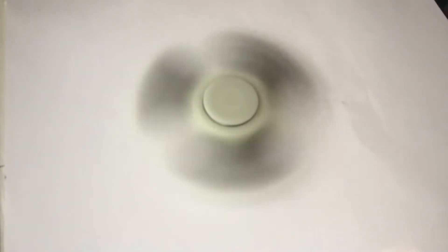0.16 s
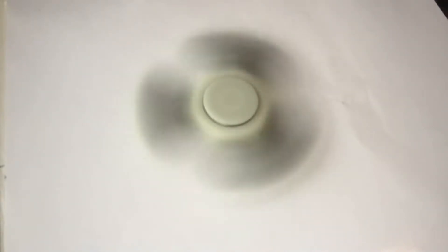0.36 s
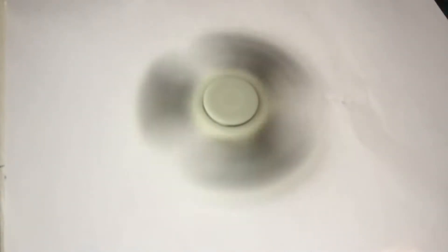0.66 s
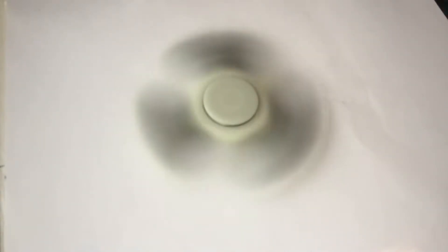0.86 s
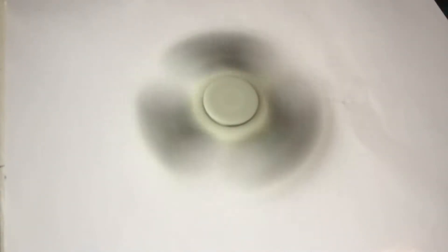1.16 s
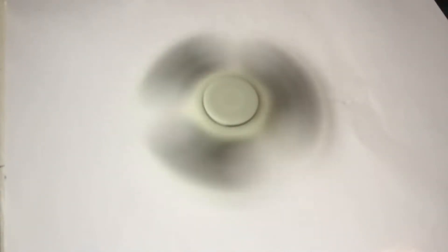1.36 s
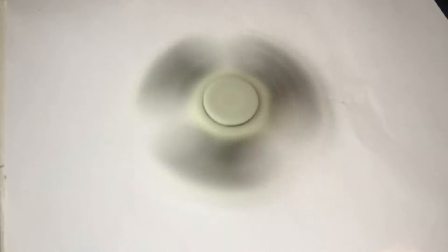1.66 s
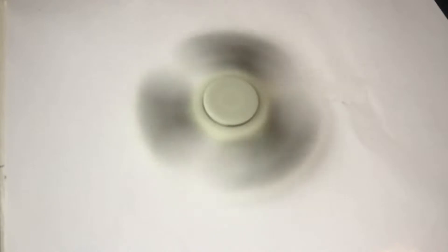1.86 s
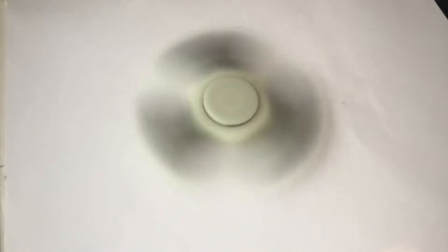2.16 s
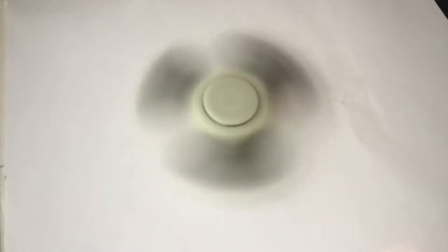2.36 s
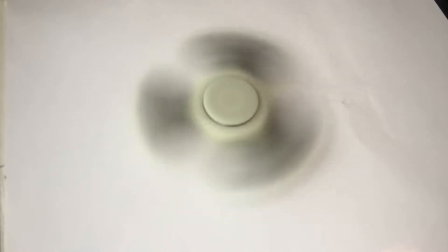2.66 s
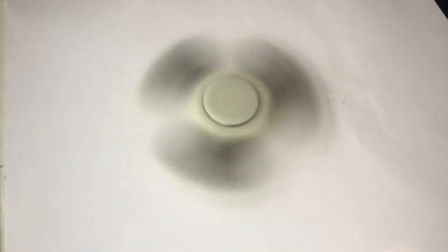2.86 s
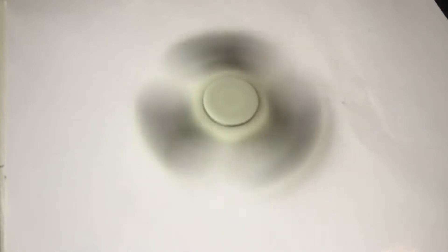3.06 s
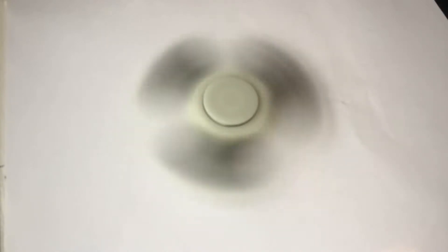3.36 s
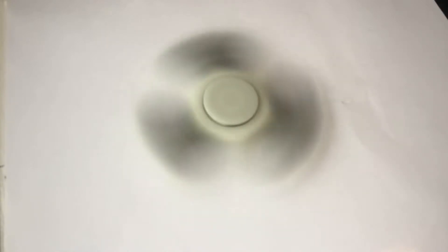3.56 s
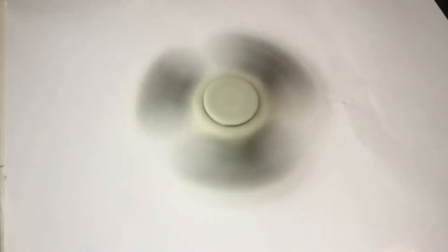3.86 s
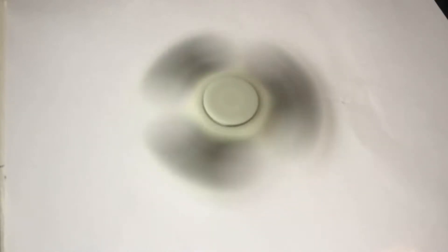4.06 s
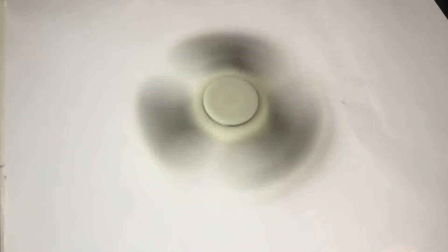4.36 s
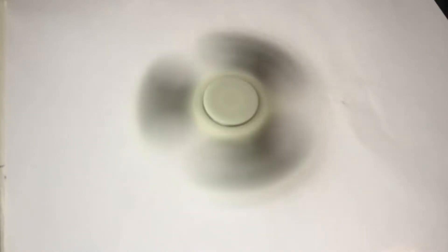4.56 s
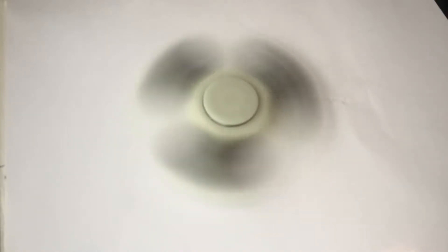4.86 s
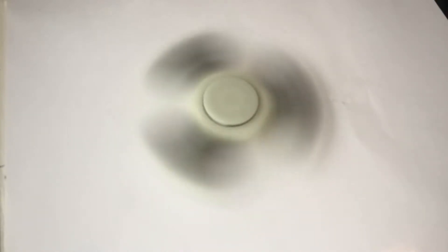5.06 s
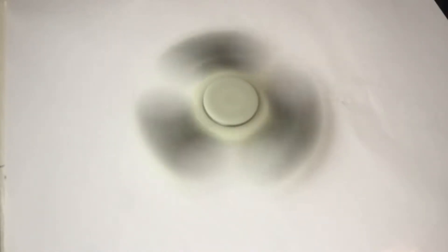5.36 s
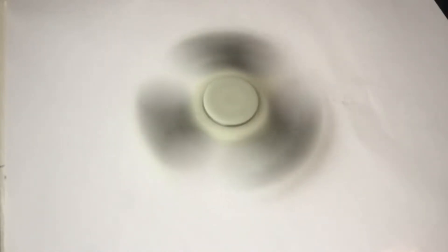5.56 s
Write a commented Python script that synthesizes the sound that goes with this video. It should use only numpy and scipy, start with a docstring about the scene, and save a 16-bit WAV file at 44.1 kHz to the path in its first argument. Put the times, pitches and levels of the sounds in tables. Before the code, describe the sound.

A plastic three-armed spinner whirs with a faint grainy high hiss, fluttering quickly, while soft low knocks and small handling ticks come from close by.

```python
"""A three-armed plastic fidget spinner coasts on a table, close to a mono microphone.
From the start, balls rolling, catching and pinging in the bearing keep the toy's resonances hissing,
pulsing with turn, ball cage and arms; the table murmurs along over a low room noise.
Fingers rub and tick on the camera body at once, knock softly from 0.24 s on, and rub squeakily from 2.3 s.
Noise through band-passes makes hiss, murmur, rubs and tick rattle; decaying sines make pings, snaps and knocks."""
import sys
import numpy as np
from scipy import signal
from scipy.fft import rfft, irfft
from scipy.io import wavfile

SR = 44100
rng = np.random.default_rng(int(sys.argv[2]) if len(sys.argv) > 2 else 0)


def persist_wave(psi):
    """Save psi, clipped to +-1, as 16-bit WAV."""
    counts = np.round(np.clip(psi, -1, 1) * 32767).astype(np.int16)
    wavfile.write(sys.argv[1], SR, np.atleast_2d(counts).T)


N = 252119
TIME = np.arange(N) / SR
CONTACT_RISE_S = 0.00034  # snaps and pings take a moment to build up


def amp(db):
    """Amplitude factor of a level in dB."""
    return 10 ** (np.asarray(db) / 20)


def unit(x):
    """Scales to an RMS of 1."""
    return x / np.sqrt(np.mean(x ** 2) + 1e-20)


def wander(rate_hz):
    """Smooth chance of unit RMS: random knots joined by lines."""
    knots = rng.standard_normal(N)
    return unit(np.interp(TIME * rate_hz, np.arange(N), knots))


def add(mix, start_s, sound):
    """Lays a sound into the mix at start_s."""
    part = mix[round(start_s * SR):][:len(sound)]
    part += sound[:len(part)]


def resonate(x, hz, width_hz):
    """A steep resonance: one band-pass applied twice, keeping the power of white noise."""
    section = np.concatenate(signal.iirpeak(hz, hz / width_hz, SR))
    return signal.sosfilt([section, section], x) / np.sqrt(np.pi * width_hz / 2 / SR)


def reach(hz, centre_hz, focus):
    """How well a force with its spectrum around centre_hz excites a mode at hz: 1 at the centre."""
    return (2 / (hz / centre_hz + centre_hz / hz)) ** focus


def burst(start_s, t60_s):
    """Power of a contact that starts at start_s and dies away."""
    power = np.zeros(N)
    add(power, start_s, amp(-60 * TIME[:SR // 2] / t60_s) ** 2)
    return power


START_TURNS_PER_S, SLOWING_TURNS_PER_S2 = 11.295, .1988


def spin_speed():
    """Turns per second: drag slows the coasting toy evenly."""
    return START_TURNS_PER_S - SLOWING_TURNS_PER_S2 * TIME


def chatter(per_s, spread_db, share, t60_s):
    """Contact power of mean 1: smooth rolling plus a share of tiny ball impacts of uneven size."""
    happens = rng.random(N) < per_s / SR
    size_db = spread_db * np.minimum(rng.exponential(1, N), 4)
    hits = happens * amp(size_db) ** 2
    decay = amp(-60 / t60_s / SR) ** 2
    hits = signal.lfilter([1], [1, -decay], hits)
    share = np.clip(share, 0, 1)
    return 1 - share + share * hits / hits.mean()


CAGE_PER_TURN, HALF_TURN, ARMS = .6425, 2, 3  # swells per turn
# swells of the hiss as the ball cage circles and the arms sweep past:
# per_turn, centre_hz, focus (narrowness of the band), swing_db (at centre_hz), crest_cycles
SWELLS = [(CAGE_PER_TURN, 3610, 140, 1.86, .46), (CAGE_PER_TURN, 4880, 110, 1.2, -.01),
          (HALF_TURN, 4050, 91, 0.71, .38), (HALF_TURN, 6180, 160, 2.3, -0.22), (ARMS, 7250, 400, 2.4, .01),
          (ARMS, 7660, 220, 1.24, -0.36), (ARMS, 11000, 120, 3.3, 0.25)]


def swell_db(turn, hz):
    """The circling cage and the passing arms lift and lower a resonance at hz."""
    total_db = 0
    for per_turn, centre_hz, focus, swing_db, crest_cycles in SWELLS:
        share = reach(hz, centre_hz, focus)
        if share > .02:
            total_db = total_db + swing_db * share * np.cos(2 * np.pi * (per_turn * turn - crest_cycles))
    return total_db


# hard catches of the balls: start_s, strength_db (power scale re smooth rolling), t60_s
CATCHES = [(.398, 8, 0.026), (1.0535, 13, .012), (1.396, 12, .012), (1.543, 3, .16), (1.693, 4, .07),
           (1.825, 8, .09), (2.475, 3, 0.11), (2.838, 1, .07), (3.335, 5, 0.075), (3.757, 5, .07),
           (4.004, 4, 0.087), (4.108, 9, .08), (4.478, 7.5, 0.066), (5.077, 11, .014), (5.219, 11, .02),
           (5.52, 7.5, .06)]
LIGHT_CATCHES_PER_S, LIGHT_CATCH_DB, LIGHT_CATCH_SPREAD_DB, LIGHT_CATCH_T60_S = 12, -19, 5, 0.05
CATCH_RISE_SHARE = 0.067  # of a catch's decay time


def catching():
    """Extra contact power where the balls catch: a few hard catches among light ones by chance."""
    chances = rng.random(size=(64, 2))
    starts_s = np.cumsum(.5 + chances[:, 0]) / LIGHT_CATCHES_PER_S
    strengths_db = LIGHT_CATCH_DB + LIGHT_CATCH_SPREAD_DB * (chances[:, 1] - .5)
    light = [(s, db, LIGHT_CATCH_T60_S) for s, db in zip(starts_s, strengths_db) if s < TIME[-1]]
    power = np.zeros(N)
    for start_s, strength_db, t60_s in CATCHES + light:
        shape = burst(start_s, t60_s) - burst(start_s, t60_s * CATCH_RISE_SHARE)
        power += amp(strength_db) ** 2 * shape
    return power


# resonances of bearing and toy:
# hz, width_hz (of each band-pass), level_db (relative), swing_db (over one turn), crest_turns
TOY = [(3056, 58, -77.5, -1, -0.49), (3277, 260, -63, 4, 0.041), (3369, 230, -60, 3, -0.34),
       (3803, 480, -58.5, -0.5, 0.16), (4020, 38, -70.5, 7.5, -0.0054), (4360, 390, -59.5, 0, -0.65),
       (4698, 290, -60, 1.5, 0.052), (5043, 250, -63, 2.5, -0.03), (5300, 240, -64, 7, 0.036),
       (5410, 460, -66, -3.5, 0.025), (5940, 210, -64, 1.5, -0.15), (6210, 490, -60, 0.9, 0.25),
       (6930, 650, -59.5, 2, 0.12), (7035, 160, -63.5, -3.5, 0.3), (7345, 520, -61, 2.5, 0.072),
       (7935, 340, -63.5, 1.5, -0.21), (8165, 240, -63.5, 2.5, -0.1), (8560, 170, -67, 3, -0.2),
       (8565, 1240, -59, -1.5, -0.16), (9435, 600, -65, 1.5, -0.27), (11010, 700, -70.5, 2.5, 0.42),
       (15500, 4600, -75, 1, -0.023)]


def bearing(turn, contact):
    """The contact excites each resonance; the unbalanced load lifts each at its own angle of the turn."""
    catches = catching()
    surge_db = 0.65 * wander(rate_hz=45)  # the balls bunch up and spread out again
    out = np.zeros(N)
    for hz, width_hz, level_db, swing_db, crest_turns in TOY:
        heavy = reach(hz, centre_hz=3930, focus=14.0)  # catches and surges move mainly resonances near this
        force = np.sqrt(contact * (1 + catches * heavy))
        load_db = swing_db * np.cos(2 * np.pi * (turn - crest_turns))
        load_db = load_db + swell_db(turn, hz)
        load_db = load_db + heavy * surge_db
        load_db = load_db + 1.92 * wander(rate_hz=170)
        noise = force * amp(load_db) * rng.standard_normal(N)
        out += amp(level_db) * resonate(noise, hz, width_hz)
    return amp(-1) * out


PINGS_PER_S, PING_LOW_HZ, PING_HIGH_HZ = 130, 4094, 9010
PING_DB, PING_SPREAD_DB, PING_T60_S = -56.5, 2, 0.053  # PING_DB: smallest ping, before friction


def pings(count):
    """Single balls ring briefly in the race, each at one of count pitches: the hiss turns grainy."""
    age_s, out = TIME[:SR // 10], np.zeros(N)
    pitches_hz = np.linspace(PING_LOW_HZ, PING_HIGH_HZ, count)
    chances = rng.random(size=(2000, 3))
    starts_s = np.cumsum(2 * chances[:, 0]) / PINGS_PER_S
    shape = amp(-60 * age_s / PING_T60_S) * (1 - np.exp(-age_s / CONTACT_RISE_S))
    rings = shape * np.sin(2 * np.pi * pitches_hz[:, None] * age_s)
    for start_s, (_, which, size) in zip(starts_s[starts_s < TIME[-1]], chances):
        level_db = PING_DB + PING_SPREAD_DB * min(-np.log(1 - size), 3)
        add(out, start_s, amp(level_db) * rings[int(which * count)])
    return out


# echoes off the table top and things near it: delay_s, gain (before the power is evened out)
ECHOES = [(.0031, 0.04), (.0083, -0.09), (0.0161, .1), (0.027, -0.08)]


def reflect(x):
    """Near echoes comb the hiss finely and keep its power."""
    echoes = sum(gain * np.pad(x, (round(delay_s * SR), 0))[:N] for delay_s, gain in ECHOES)
    return (x + echoes) / np.sqrt(1 + sum(gain ** 2 for _, gain in ECHOES))


# resonances of the table: hz, width_hz (of each band-pass), level_db (relative)
TABLE = [(274, 85, -73), (376, 130, -77), (500.4, 88, -77), (682.5, 65, -76.5), (889, 210, -77.5),
         (1038, 40, -79), (1377, 620, -71.5), (1628, 76, -77.5), (1760, 52, -79), (2040, 140, -79),
         (2210, 52, -79), (2362, 106, -74.5), (2455, 57, -76.5), (2614, 91, -77.5), (2730, 320, -77.5)]


def table(turn, contact, swing_db):
    """The rolling shakes the table's resonances through the hub."""
    force = np.sqrt(contact) * amp(swing_db * np.cos(2 * np.pi * turn))
    out = np.zeros(N)
    for hz, width_hz, level_db in TABLE:
        gain = amp(level_db - .5 + 3.73 * wander(rate_hz=36))
        out += gain * resonate(force * rng.standard_normal(N), hz, width_hz)
    return out


# room and microphone noise: hz, density_db (dB per Hz)
FLOOR = [(20, -108), (35, -103), (55, -100), (130, -97), (600, -110), (2000, -107), (5000, -103),
         (10000, -112), (13000, -116), (15500, -116)]


def room():
    """Steady low noise of the room and a trace of microphone hiss: white noise coloured by FLOOR."""
    hz, density_db = np.transpose(FLOOR)
    bins_hz = np.fft.rfftfreq(N, 1 / SR)
    colour = amp(np.interp(np.log(bins_hz + 1), np.log(hz), density_db))
    return irfft(rfft(rng.standard_normal(N)) * colour, N) * np.sqrt(SR / 2)


RUB_ATTACK_S, RUB_RELEASE_DB_PER_S = 0.0039, 86


def rub(start_s, length_s, level_db, from_hz, to_hz):
    """A finger presses on, slides with a grainy grip, lifts off: its power and centre of spectrum."""
    age_s = TIME - start_s
    release_db = RUB_RELEASE_DB_PER_S * np.maximum(age_s - length_s, 0)
    grip = amp(level_db - release_db + 1.1 * wander(rate_hz=78))
    force = np.clip(age_s / RUB_ATTACK_S, 0, 1) * grip
    return force ** 2, np.interp(age_s, [0, length_s], [from_hz, to_hz])


# fingers sliding on the camera body: start_s, length_s (to lift-off), level_db (of the force), from_hz, to_hz
RUBS = [(0, 0.022, -64.5, 1850, 2000), (2.283, 0.013, -65, 1600, 1700), (2.29, .03, -69.5, 180, 200),
        (2.367, 0.1, -70.5, 1750, 1850), (2.47, 0.023, -65.5, 2000, 2100), (2.599, 0.18, -67, 300, 400)]
# light ticks of the fingers on it:
# start_s, rattle_db (of the force), centre_hz, t60_s (of the force), focus (narrowness), snap_db (relative)
TICKS = [(0.013, -53.5, 1040, 0.17, 2.8, -59), (1.051, -59, 2450, .06, 18, -45),
         (2.092, -59, 2450, 0.033, 30, -49), (2.1025, -56, 3360, .02, 60, -41),
         (2.1047, -53, 1440, 0.14, 70, -43), (2.1062, -64, 1770, .03, 110, -41),
         (2.123, -56, 1520, .02, 40, -50), (3.344, -63, 604, 0.1, 2, -66),
         (3.608, -58, 1200, 0.063, 3.4, -66), (3.999, -55, 715, 0.12, 3.4, -65),
         (4.0775, -59, 1160, 0.13, 5.1, -46), (4.488, -56, 800, 0.14, 4.5, -73)]
# resonances of the camera body: hz, width_hz (of each band-pass), level_db (relative)
CASE = [(146, 110, 1.5), (304, 210, -3.5), (491, 107, -2.5), (696, 103, -5), (963, 200, -14.5),
        (1340, 180, -6), (1485, 64, -6.5), (1643, 77, -5.5), (1808, 150, -2), (2060, 450, -3),
        (2460, 490, 2.5), (3380, 240, -5)]


def fingers():
    """Ticks and rubs excite the same resonances of the camera body, each with its own brightness."""
    touches = []
    for start_s, rattle_db, centre_hz, t60_s, focus, _ in TICKS:
        touches.append((amp(rattle_db) ** 2 * burst(start_s, t60_s), centre_hz, focus))
    for row in RUBS:
        touches.append((*rub(*row), .7))  # a rub is broader in spectrum than a tick
    out = np.zeros(N)
    for hz, width_hz, level_db in CASE:
        power = sum(touch * reach(hz, centre_hz, focus) ** 2 for touch, centre_hz, focus in touches)
        out += amp(level_db) * resonate(np.sqrt(power) * rng.standard_normal(N), hz, width_hz)
    return out


def snaps():
    """The first contact of each tick strikes the camera body's resonances all at once."""
    age_s, out = TIME[:SR // 10], np.zeros(N)
    rise = 1 - np.exp(-age_s / CONTACT_RISE_S)
    for start_s, _, centre_hz, _, focus, snap_db in TICKS:
        ring = np.zeros(len(age_s))
        for hz, width_hz, level_db in CASE:
            mode = np.exp(-np.pi * width_hz * age_s) * np.sin(2 * np.pi * hz * age_s)
            ring += reach(hz, centre_hz, focus) * amp(level_db) * mode
        add(out, start_s, amp(snap_db) * ring * rise)
    return out


# soft knocks: start_s, strength_db (relative), blow_hz (centre of spectrum), rise_s, ring_factor (on mode t60)
KNOCKS = [(0.242, -48.5, 142, 0.0075, 0.74), (0.298, -32.5, 88, 0.0064, 0.96),
          (.327, -40.5, 172, 0.0042, 0.89), (.335, -52, 65, 0.0046, 0.54), (0.499, -42, 128, 0.0056, 0.8),
          (0.515, -50, 100, .004, .6), (0.545, -47, 320, .005, 0.99), (.568, -50, 166, .004, 0.7),
          (.555, -55, 65, .008, 0.7), (.664, -46, 283, .005, 0.98), (0.767, -42, 250, 0.0036, 0.81),
          (0.778, -51, 115, 0.0054, 0.65), (1.22, -43, 225, 0.0019, .7), (1.238, -48.5, 135, .002, 0.7),
          (1.395, -54, 145, 0.0055, 0.68), (1.669, -53, 310, 0.0026, 0.86),
          (2.105, -46.5, 477, 0.00071, .9), (2.1059, -48.5, 280, 0.0013, 1.2), (2.107, -57, 135, .002, .7),
          (2.29, -51, 115, .005, 0.87), (2.486, -54, 73.5, .005, 0.88), (4.0795, -41, 345, 0.0028, .8),
          (4.083, -51, 520, 0.00077, 0.84), (5.255, -65, 70, .005, 0.65)]
# modes the knocks ring: hz, level_db (relative), t60_s (before ring_factor)
THUD = [(62.5, 1, 0.18), (133.5, -2, 0.19), (188, -2.5, 0.15), (226, -10, 0.15), (275, -6, 0.11),
        (318, -0.5, 0.067), (368, -11.5, 0.088), (502, -6, 0.14), (690, 5, 0.13)]


def knocks(focus):
    """A soft blow rings the low modes nearest to its own spectrum; the finger alters their ring time."""
    age_s, out = TIME[:SR // 2], np.zeros(N)
    for start_s, strength_db, blow_hz, rise_s, ring_factor in KNOCKS:
        ring = np.zeros(len(age_s))
        for hz, level_db, t60_s in THUD:
            decay = amp(level_db - 60 * age_s / (t60_s * ring_factor))
            ring += reach(hz, blow_hz, focus) * decay * np.sin(2 * np.pi * hz * age_s)
        add(out, start_s, amp(strength_db) * ring * (1 - np.exp(-age_s / rise_s)))
    return out


# faint squeaks of the sliding skin: start_s, length_s, level_db (mid-squeak, before flicker), from_hz, to_hz
SQUEAKS = [(2.29, 0.22, -68, 1777, 1620), (2.371, 0.2, -67, 1388, 1277), (2.47, 0.06, -65, 2100, 2080),
           (2.537, 0.067, -68, 1385, 1364), (2.552, 0.15, -70, 2020, 1830), (2.725, 0.187, -68, 1325, 1365)]
SQUEAK_JITTER_HZ, SQUEAK_FLICKER_DB = 36, 2.5  # RMS


def squeaks():
    """Skin sticks and slips: a thin, unsteady tone that glides as the finger changes speed."""
    out = np.zeros(N)
    for start_s, length_s, level_db, from_hz, to_hz in SQUEAKS:
        along = np.clip((TIME - start_s) / length_s, 0, 1)
        pitch_hz = from_hz + (to_hz - from_hz) * along
        pitch_hz = pitch_hz + SQUEAK_JITTER_HZ * wander(rate_hz=300)
        flicker = amp(level_db + SQUEAK_FLICKER_DB * wander(rate_hz=110))
        grip = 2 * np.sqrt(along * (1 - along)) * flicker
        out += grip * np.sin(2 * np.pi * np.cumsum(pitch_hz) / SR)
    return out


START_TURN = .484
HISS_DB_PER_TURN_PER_S = 2  # re mean speed


def scene():
    """One rolling contact drives both the toy and the table; it eases as the spin slows."""
    speed = spin_speed()
    turn = START_TURN + np.cumsum(speed) / SR
    friction_db = HISS_DB_PER_TURN_PER_S * (speed - speed.mean())
    flutter_db = 0.34 * wander(rate_hz=80)  # the play in the bearing makes the load uneven
    contact = amp(friction_db + flutter_db) ** 2
    contact = contact * chatter(per_s=1200, spread_db=3.0, share=0.3, t60_s=0.0017)
    toy = bearing(turn, contact) + amp(friction_db) * pings(count=60)
    spinner = reflect(toy) + table(turn, contact, swing_db=0.5)
    touches = fingers() + snaps() + knocks(focus=27.0) + squeaks()
    mono = spinner + room() + touches
    return np.array([mono, mono])


EDGE_HZ = 15800


def record(dry):
    """The microphone drops the deepest bass; a steep low-pass then limits the band at EDGE_HZ."""
    bass_cut = signal.butter(4, 42, "highpass", fs=SR, output="sos")
    thinned = signal.sosfilt(bass_cut, dry)
    band_limit = signal.firwin(767, EDGE_HZ, window=("kaiser", 9), fs=SR)
    return signal.oaconvolve(thinned, band_limit[None], "same")


dry = scene()
out = record(dry)
persist_wave(out)
```